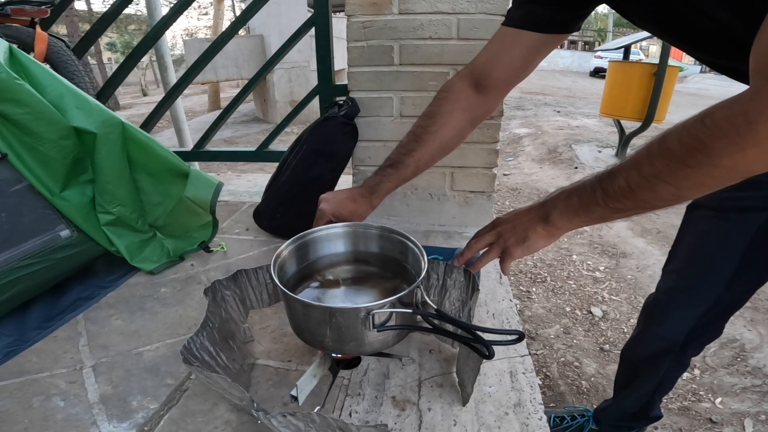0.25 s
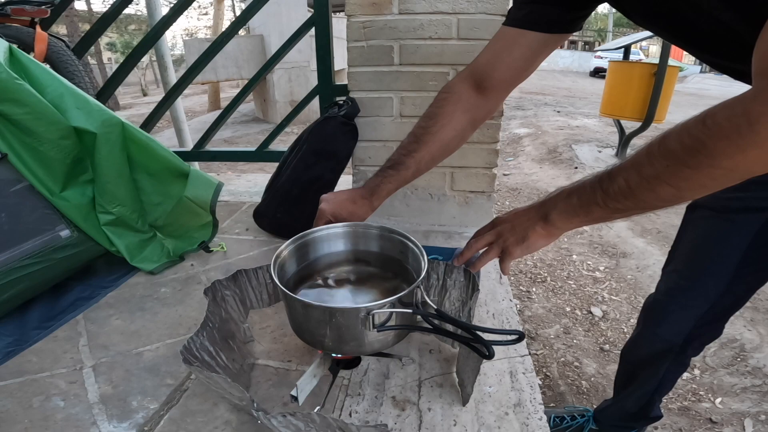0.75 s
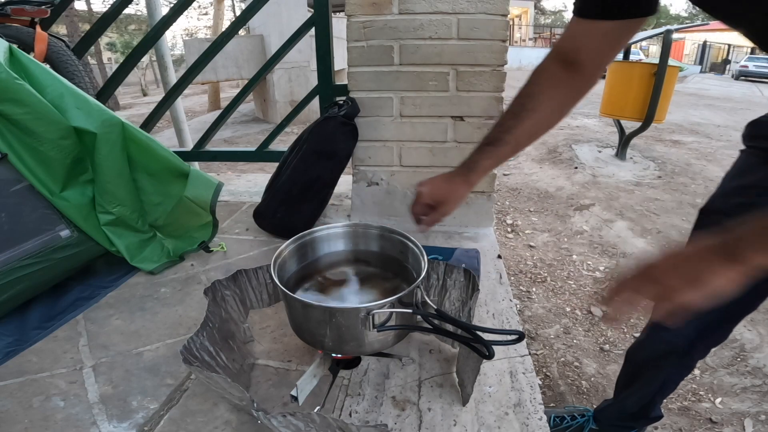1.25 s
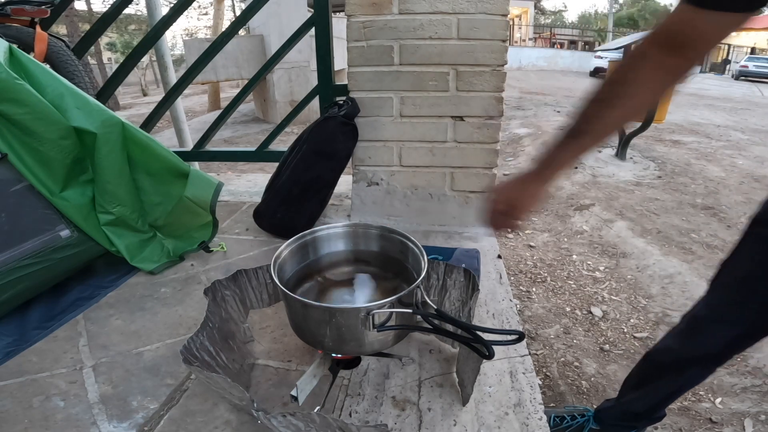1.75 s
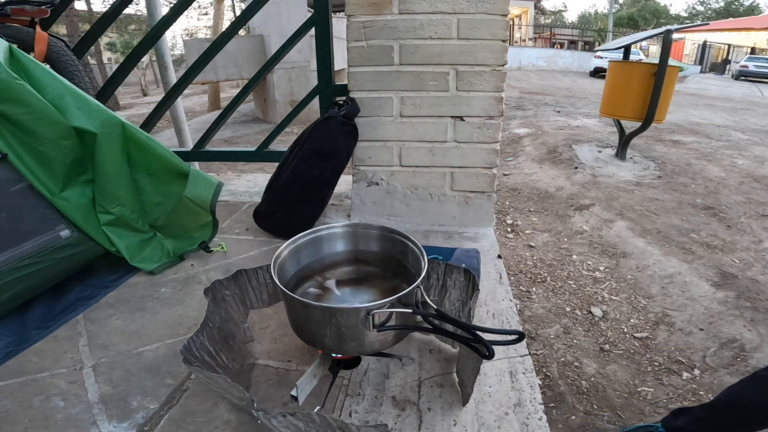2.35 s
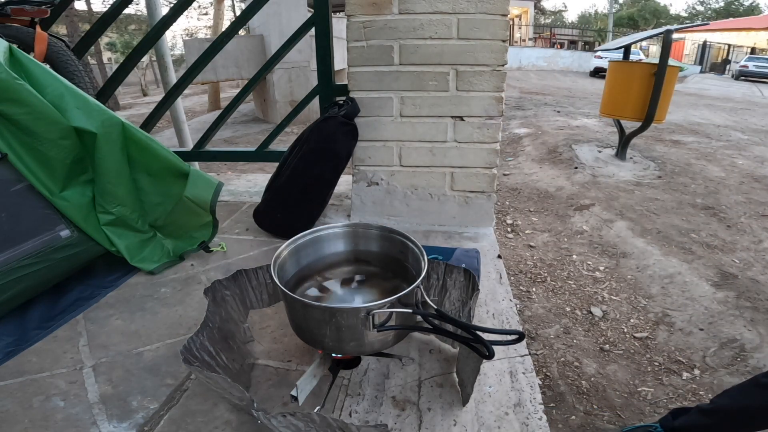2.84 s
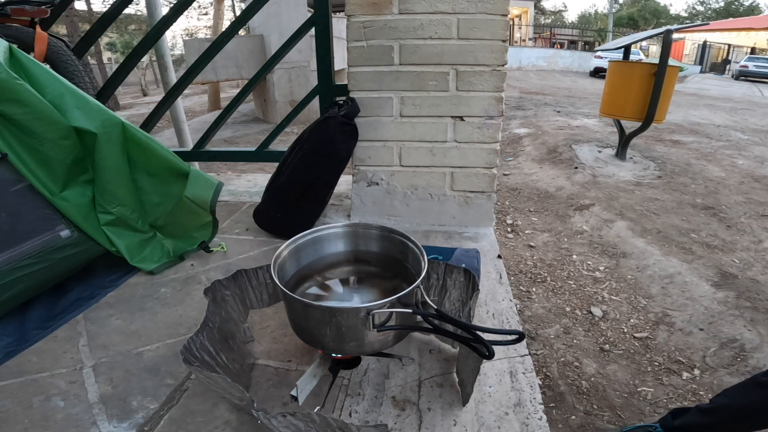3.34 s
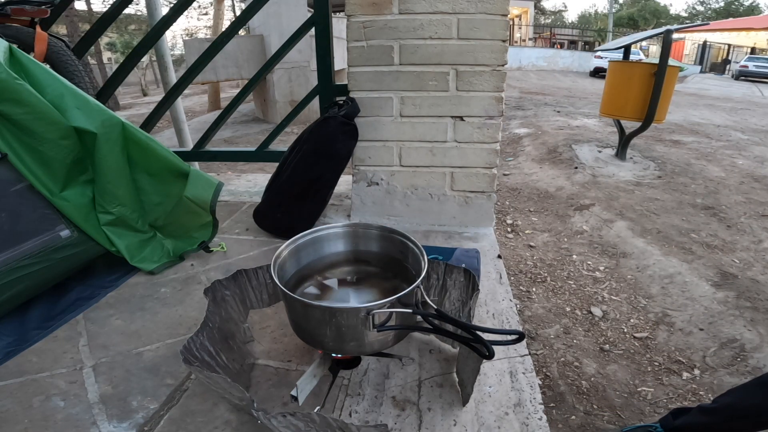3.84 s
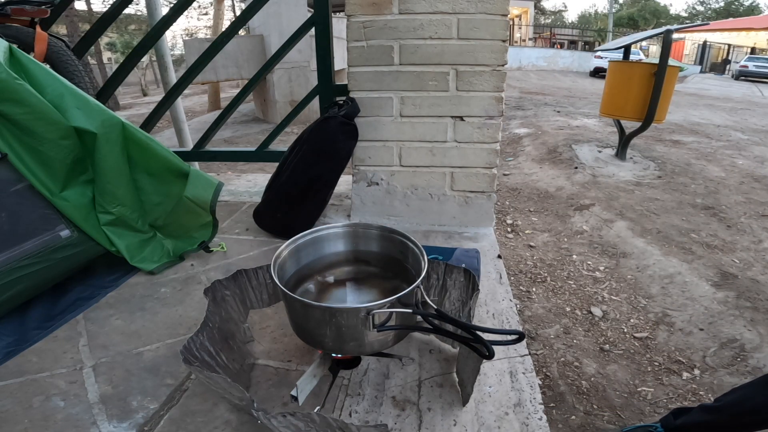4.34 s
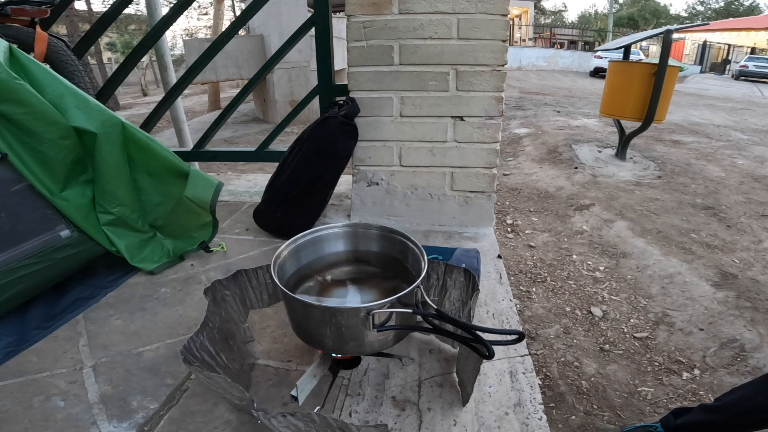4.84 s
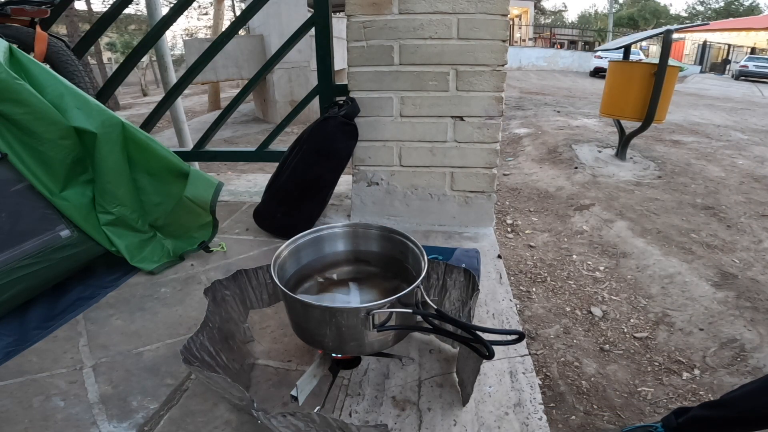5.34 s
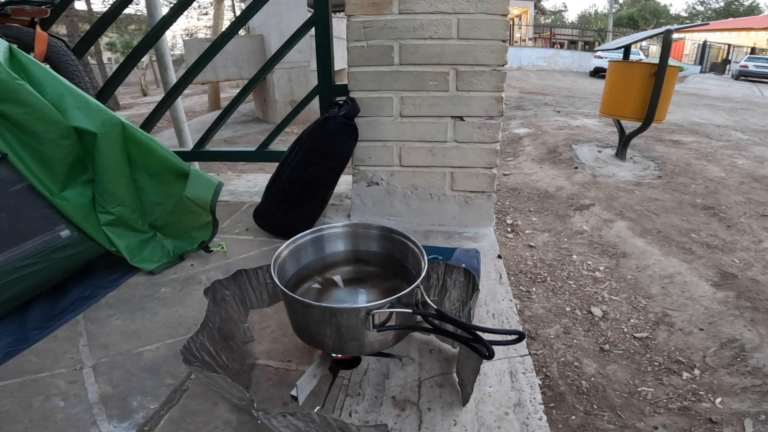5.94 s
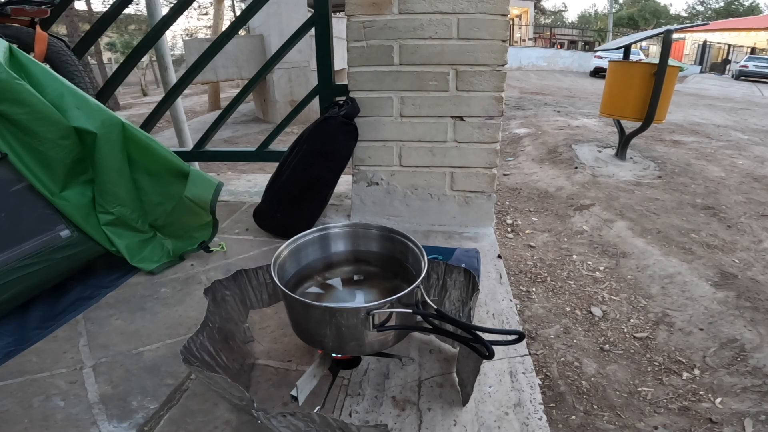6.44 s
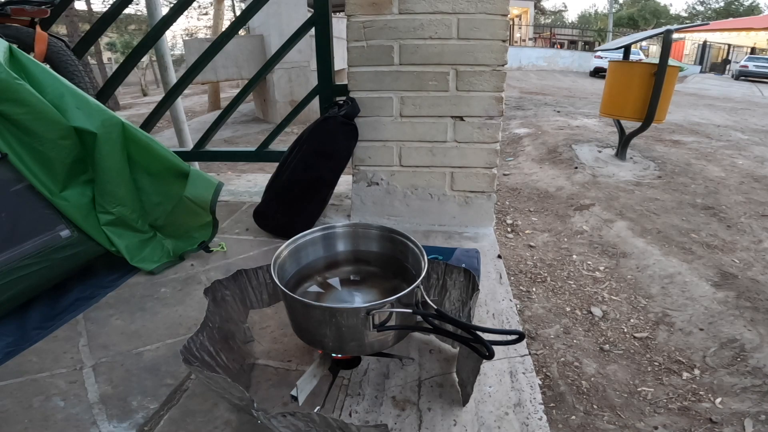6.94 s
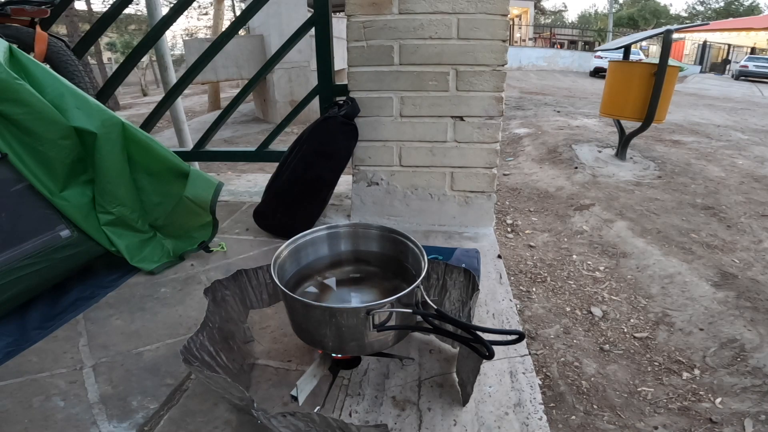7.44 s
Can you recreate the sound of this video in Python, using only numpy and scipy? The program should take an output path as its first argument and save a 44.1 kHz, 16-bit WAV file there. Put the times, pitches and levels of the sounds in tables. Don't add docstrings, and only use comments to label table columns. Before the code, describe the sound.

Continuous stove roar from start to end: bright fizzing hiss on top, muffled burning rumble from the hollow under the pot below. Low traffic noise from a nearby road rolls beneath, with engine tones gliding down early and rising later. The small camera microphone is close, outdoors on stone, with heavy bass, rough overloaded peaks and slightly patchy, compressed treble.

```python
import sys
import numpy as np
from scipy import signal
from scipy.io import wavfile
from scipy.ndimage import uniform_filter1d, minimum_filter1d

SR = 44100
rng = np.random.default_rng(int(sys.argv[2]) if len(sys.argv) > 2 else 0)


def to_wav(s):
    ch = np.atleast_2d(s).T
    pcm = np.round(np.clip(ch, -1, 1) * 32767)
    wavfile.write(sys.argv[1], SR, pcm.astype(np.int16))


def invert_db(x):
    u = np.asarray(x, float) / 20
    return 10 ** u


N = 339129


def evened(x):
    return x / np.sqrt(np.mean(x ** 2) + 1e-20)


def read(points, hz, column=1):
    rows = np.transpose(points)
    return np.interp(np.log(hz + 1), np.log(rows[0] + 1), rows[column])


def level(rows, s):
    start_s, level_db = np.transpose(rows)
    return invert_db(np.interp(s, start_s, level_db))


def spells(rows, s):
    return invert_db(sum(db * np.exp(-(2 * (s - middle_s) / length_s) ** 2) for middle_s, length_s, db in rows))


def bump(hz, centre_hz, width_hz):
    return 1 / (1 + (2 * (hz - centre_hz) / width_hz) ** 2)


def patchwork(bins, frames, wide, long):
    field = rng.standard_normal((frames, bins)).T
    field = uniform_filter1d(field, max(round(wide), 1), 0)
    return evened(uniform_filter1d(field, max(round(long), 1), 1))


# pitch_hz, left_right_likeness, left_lead_rad, left_minus_right_db
PORTS = [(60, .9994, 0, 0), (140, .998, 0, .1), (250, .975, -.05, .3), (560, .99, -.08, -.5),
         (800, .83, -.35, 1), (1150, .73, -.45, 2.3), (1800, .73, -.5, .3), (2300, .94, -.5, -.5),
         (3100, .8, -.55, 0), (6000, .9, -.35, .6), (7000, .98, -.05, 1.8), (9800, .99, 0, 4.2),
         (11300, .97, 0, 5.5), (12700, .8, 0, 5), (13500, .5, 0, 1)]


def turbulence(gain, size, patchy_db, patch_hz, patch_s, top_hz):
    hop = size // 4
    hz = np.fft.rfftfreq(size, 1 / SR)
    hz = hz[hz < top_hz]
    s = np.arange(N // hop + 6) * hop / SR
    a, b, c, d = rng.standard_normal((len(s), len(hz), 4)).T
    patches = patchwork(len(hz), len(s), patch_hz * size / SR, patch_s * SR / hop)
    same = np.clip(read(PORTS, hz), 0, 1)[:, None]
    lead_rad, tilt_db = read(PORTS, hz, column=2), read(PORTS, hz, column=3)
    tilt = (invert_db(tilt_db / 2) * np.exp(.5j * lead_rad))[:, None]
    left = a + 1j * b
    right = same * left + np.sqrt(1 - same ** 2) * (c + 1j * d)
    z = np.zeros((2, size // 2 + 1, len(s)), complex)
    shape = gain(hz[:, None], s) * invert_db(patchy_db * patches)
    z[:, :len(hz)] = np.array([left * tilt, right / tilt]) * shape
    return evened(signal.istft(z, nperseg=size, noverlap=size - hop)[1][:, :N])


# start_s, level_db
ROAD = [(0.0, -18), (0.25, -15), (0.5, -18), (0.9, -16.5), (1.74, -16.5), (2.3, -17.5), (3.2, -17.5),
        (3.6, -17), (4.22, -18), (4.7, -15), (4.96, -17.5), (5.25, -18), (5.9, -17.5), (6.2, -16),
        (6.45, -16.5), (6.7, -15.5), (6.95, -18), (7.5, -14.5)]
# middle_s, length_s, change_db
DEEP_SWELLS = [
    (.65, 0.45, -4),
    (1.74, 0.35, 5.5),
    (2.48, 0.23, -4),
    (3.4, .6, 2.5),
    (4.45, 0.33, -6),
    (7.5, .5, -8),
]
# pitch_hz, density_db
DEEP = [(8, -26), (15, -21), (30, -0.5), (48, -2.5), (60, -15), (80, -40), (110, -100)]
# pitch_hz, density_db
RUMBLE = [(30, -50), (50, -3), (62, 4.5), (80, 0.5), (110, -2), (150, -4.5), (180, -9.5), (230, -16.5),
          (300, -20), (400, -100)]


def rumble():
    deep_follows = 1.1

    def gain(hz, s):
        near = evened(level(ROAD, s))
        deep = invert_db(read(DEEP, hz) + 5.0) * near ** deep_follows * spells(DEEP_SWELLS, s)
        return np.hypot(deep, invert_db(read(RUMBLE, hz)) * near)
    return invert_db(-13.0) * turbulence(gain, size=8192, patchy_db=0.67, patch_hz=25., patch_s=0.27, top_hz=419.4)


def hum(rows):
    start_s, pitch_hz, level_db = np.transpose(rows)
    t = np.arange(start_s[0], start_s[-1], 1 / SR)
    slow = uniform_filter1d(uniform_filter1d(rng.standard_normal((1500, 2)), 25, 0), 25, 0)
    tremble = np.repeat(evened(slow), 100, axis=0)[:len(t)]
    glide_hz = np.interp(t, start_s, pitch_hz) * (1 + .004 * tremble[:, 0])
    turns = np.cumsum(glide_hz) / SR + rng.random()
    tremble_db = 1.18 * uniform_filter1d(tremble[:, 1], size=100)
    loudness = np.sqrt(2) * invert_db(np.interp(t, start_s, level_db) + tremble_db)
    fade = signal.windows.tukey(len(t), 0.16 / (start_s[-1] - start_s[0]))
    out = np.zeros(N + SR)
    out[round(start_s[0] * SR):][:len(t)] = loudness * np.sin(2 * np.pi * turns) * fade
    return out[:N]


def passing(start_s, length_s, first_hz, last_hz, top_db):
    ends_db = -8.5
    u = np.linspace(0, 1, num=9)
    arch_db = top_db + ends_db * (2 * u - 1) ** 2
    return hum(np.transpose([start_s + length_s * u, first_hz + (last_hz - first_hz) * u, arch_db]))


# start_s, pitch_hz, level_db; the first two tables are one engine, joined near 4.3
# s
HUMS = [
    [(2.3, 76, -34), (2.5, 73.3, -19), (2.82, 72.6, -15), (3.05, 71.6, -22), (3.4, 73.5, -19),
     (3.66, 73.8, -18.5), (4.0, 77, -12), (4.15, 77, -10.5), (4.32, 78.8, -30)],
    [(4.25, 78.8, -15), (4.47, 79.3, -7), (4.75, 81, -24), (4.96, 82.6, -11.5), (5.15, 83.2, -12),
     (5.47, 85.6, -20), (5.78, 87.3, -16.5), (6.4, 92, -22.5), (6.6, 92.2, -17)],
    [(4.5, 162.4, -24), (4.98, 164.3, -19.5), (5.35, 169, -29.5), (5.6, 169.2, -22.5), (6.11, 171, -17),
     (6.27, 172.3, -19.5), (6.43, 172.2, -16), (6.85, 176.5, -21.5), (7.4, 179.6, -29.5)],
    [(0.2, 67.6, -18), (0.38, 65.1, -14), (0.7, 65.2, -15.5), (0.9, 64.6, -14), (1.08, 66, -33),
     (1.25, 60.6, -16), (1.55, 49.45, -15), (1.75, 45.44, -15), (1.95, 44.3, -41)],
]
# start_s, length_s, first_hz, last_hz
PASSES = [(0, .7, 77.5, 78.5), (.4, .75, 104.5, 109), (1.1, .5, 111, 112), (1.5, .7, 112, 126),
          (1.1, .6, 94, 91.6), (1.7, .3, 91, 90), (1.05, .3, 73.2, 74.3), (1.5, .35, 73.5, 73),
          (2.3, .85, 104.5, 107.3), (3.17, .45, 106.5, 108.3), (3.65, .85, 107.5, 109.5),
          (2.7, .7, 160, 156), (3.42, .35, 157.5, 158.5), (3.8, .6, 160, 159.5), (2.3, 1.1, 124, 126),
          (.6, .5, 155.6, 150), (1.4, .4, 186, 184.5), (2.9, .6, 37.5, 38.5), (6.1, .4, 82.3, 82),
          (6.5, .6, 83, 82.3), (6.55, .8, 92, 98), (7.2, .48, 91, 94)]
PASS_TOP_DB = [-14.5, -21.5, -21.5, -18.5, -17.5, -17.5, -15, -16.5, -17.5, -17, -22.5, -21.5, -19.5, -28,
               -20, -25, -23.5, -15, -18, -17.5, -18, -19]


def engines():
    passes = sum(passing(*row, top_db) for row, top_db in zip(PASSES, PASS_TOP_DB))
    return sum(hum(rows) for rows in HUMS) + passes


# pitch_hz, width_hz, depth_db
DIPS = [(2403, 82, 6), (2960, 140, 4), (3825, 120, 6), (4590, 100, 9), (5265, 130, 10.5), (6030, 68, 13),
        (6750, 90, 7), (8000, 120, 0.5), (9000, 310, 3), (11350, 100, 1), (12200, 130, 3)]


def dips(hz):
    return invert_db(-sum(depth_db * bump(hz, f, width_hz) for f, width_hz, depth_db in DIPS))


# start_s, level_db
BURN = [(0.0, -26), (0.4, -29), (0.75, -29), (1.0, -29), (1.55, -29.5), (2.0, -31.5), (2.6, -30),
        (3.0, -31), (3.35, -29), (3.55, -26.5), (3.75, -29), (4.2, -28), (4.73, -30), (5.0, -30.5),
        (5.7, -30.5), (6.5, -28), (7.1, -30), (7.69, -28)]


def fuel_push(s):
    return level(BURN, s)


# middle_s, length_s, change_db
GUSTS = [
    (1.77, .25, -0.5),
    (3.3, .6, -0.5),
    (4.14, 0.17, -1),
    (4.95, 1, -1.2),
    (6.5, 0.61, .8),
]
# pitch_hz, density_db
FLAME = [(80, -57), (200, 1), (320, -1.5), (500, 1), (580, -3), (680, -10.5), (850, -10), (1100, -10),
         (1500, -13), (1800, -16), (2100, -14), (2600, -20), (3200, -24), (5000, -90)]


def flame():
    flame_follows = 0.059

    def gain(hz, s):
        return invert_db(read(FLAME, hz)) * dips(hz) * fuel_push(s) ** flame_follows * spells(GUSTS, s)
    return invert_db(-22.5) * turbulence(gain, size=2048, patchy_db=0.68, patch_hz=300., patch_s=0.092, top_hz=5199)


def flutter(hz, s):
    high = np.clip((hz - 3000) / 5000, 0, 1)
    quick_db = 0.84 * patchwork(1, len(s), 1., 6.)
    strands_db = 1.8 * patchwork(len(hz), len(s), 4., 50.)
    return invert_db(high * (quick_db + strands_db))


# pitch_hz, density_db
JET = [(1200, -90), (2600, -20.5), (4000, -16), (5200, -20.5), (6600, -14), (7500, -19.5), (8300, -21.5),
       (10000, -20), (11500, -23.5), (12500, -26), (13500, -33.5), (14300, -34), (15200, -40), (17000, -80)]
# pitch_hz, width_hz, level_db
BELL = [(2302, 101, -6), (3315, 230, -12.5), (4210, 416, -8.5), (5127, 310, -11), (5643, 300, -2.5),
        (5925, 198, 1), (6180, 255, -4.5), (6720, 220, -11), (7160, 140, -14.5), (7650, 160, -15.5),
        (8700, 130, -30), (9140, 72, -12.5), (9760, 180, -19.5), (10260, 130, -19.5), (11100, 200, -26),
        (11500, 250, -21.5), (12300, 350, -30), (12900, 200, -28)]


def jet():
    fizz_follows = 0.16

    def gain(hz, s):
        modes = sum(invert_db(2 * db) * bump(hz, f, 1.31 * width_hz) ** 2 for f, width_hz, db in BELL)
        share = bump(hz, 6050, 1500) ** 2
        push = evened(fuel_push(s))
        drive = share * push + (1 - share) * push ** fizz_follows
        return np.sqrt(invert_db(2 * read(JET, hz)) + modes) * dips(hz) * drive * flutter(hz, s)
    return invert_db(-24.0) * turbulence(gain, size=1024, patchy_db=0.88, patch_hz=250., patch_s=.04, top_hz=16995)


def scene():
    return rumble() + engines() + flame() + jet()


def blocks(bins, frames, wide):
    field = rng.standard_normal((frames // 2 + 2, bins // wide + 1))
    field = evened(field[1:] + .7 * field[:-1])
    return np.repeat(np.repeat(field, 2, axis=0), wide, axis=1)[:frames, :bins].T


def weak(z):
    power = uniform_filter1d(abs(z) ** 2, size=5, axis=1)
    around = uniform_filter1d(power, size=30, axis=0)
    return uniform_filter1d(power, size=3, axis=0) < invert_db(-11) * around


# middle_s, length_s, change_db
SPELLS = [
    (.2, 0.54, -6),
    (1.77, .2, 10),
    (2.55, .7, 13),
    (2.97, 0.41, 16),
    (4.1, 0.58, -10.5),
    (4.73, 0.203, -3),
    (5.3, 0.44, 13),
    (5.7, 0.23, 6.5),
]
# pitch_hz, cost_db
SIDE_COST = [(60, -25), (200, -23), (350, -35), (750, -38.5), (1500, -60), (3000, -47), (3700, -16),
             (5000, 0), (5500, -17.5), (6500, -15), (7200, -32), (9300, -24), (9800, -72)]


def narrowed(x):
    hz, s, (mid, side) = signal.stft(np.array([x[0] + x[1], x[0] - x[1]]) / 2, SR, nperseg=1024)
    busy = np.interp(hz, [2500, 3500, 6400, 7600], [0, 1, 1, 0])[:, None]
    usual_db = -22.5
    spare = (invert_db(usual_db) * spells(SPELLS, s)) ** busy * invert_db(-24 * (1 - busy))
    spare = spare * invert_db(4.0 * blocks(len(hz), len(s), wide=8) + 6.0 * blocks(len(hz), len(s), wide=32))
    edge_hz = 14350 + 345 * np.round(1.1 * blocks(1, len(s), wide=1))
    side = side * (spare > invert_db(read(SIDE_COST, hz))[:, None]) * (hz[:, None] < edge_hz - 500)
    mid = mid * (hz[:, None] < edge_hz)
    kept = ~(weak(mid) & (hz[:, None] > 7000))
    mid, side = mid * kept, side * kept
    return signal.istft(np.array([mid + side, mid - side]), SR, nperseg=1024)[1][:, :N]


def band_limit(x):
    return signal.sosfilt(signal.butter(12, 15600, fs=SR, output="sos"), x)


def record(dry):
    ceiling = 1.2
    room = np.minimum(ceiling / (abs(dry).max(0) + 1e-9), 1)
    gain = uniform_filter1d(minimum_filter1d(room, size=260), size=200)
    mix = narrowed(np.clip(dry * gain, -.99, .99))
    return band_limit(mix)


dry = scene()
out = record(dry)
to_wav(out)
```